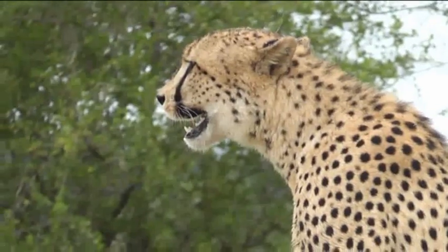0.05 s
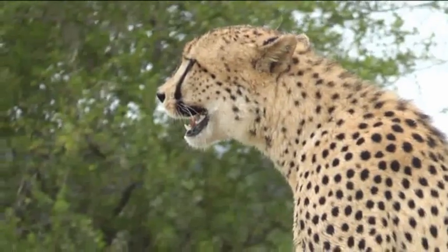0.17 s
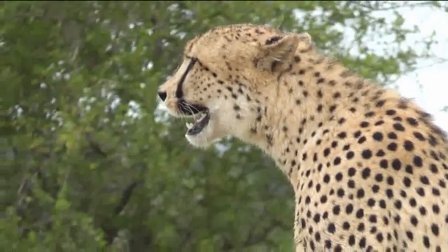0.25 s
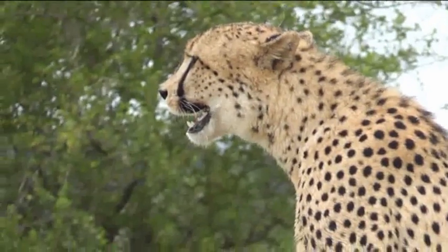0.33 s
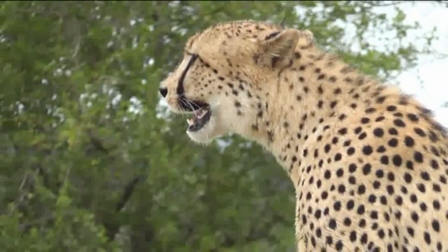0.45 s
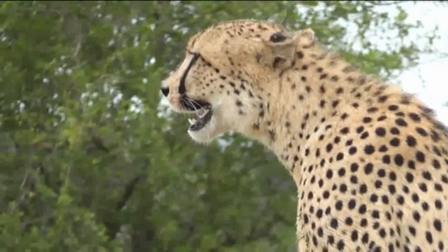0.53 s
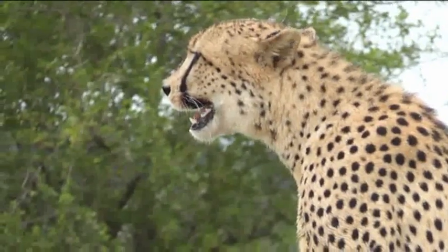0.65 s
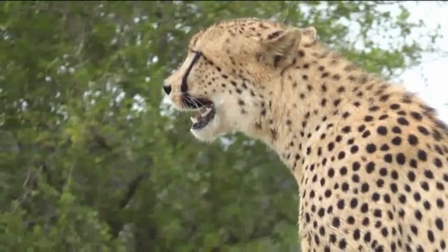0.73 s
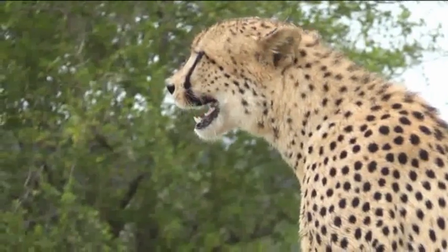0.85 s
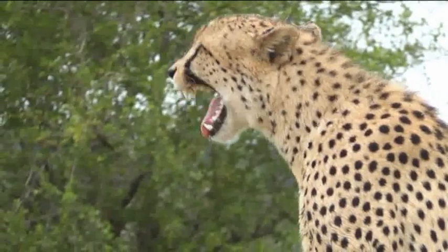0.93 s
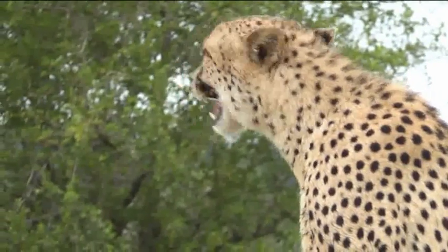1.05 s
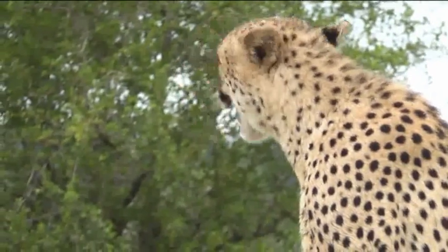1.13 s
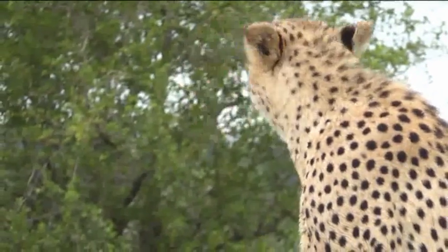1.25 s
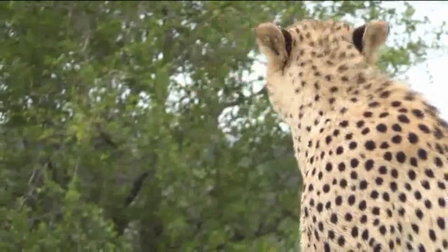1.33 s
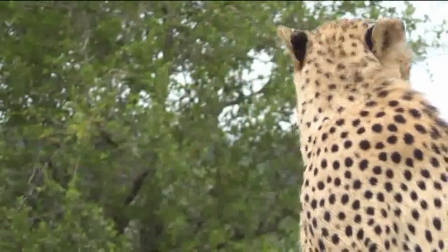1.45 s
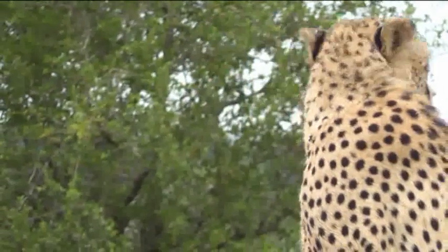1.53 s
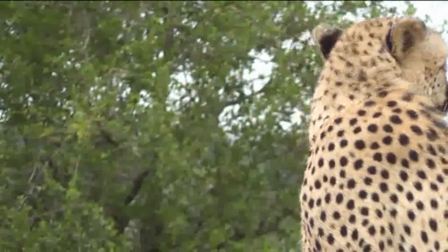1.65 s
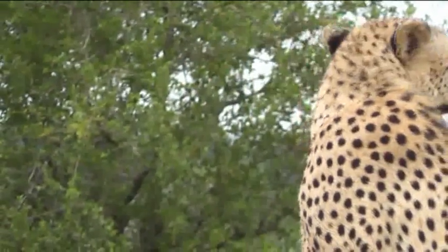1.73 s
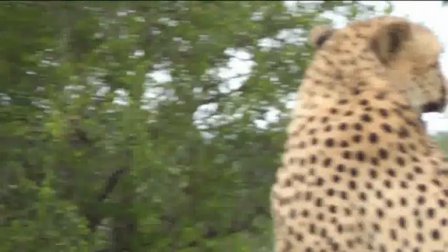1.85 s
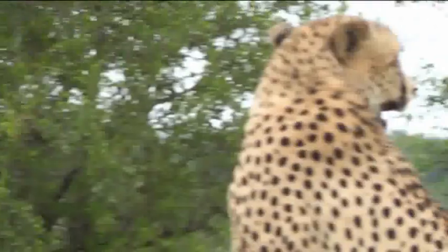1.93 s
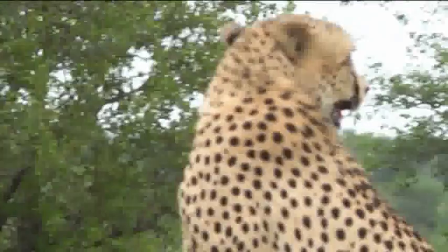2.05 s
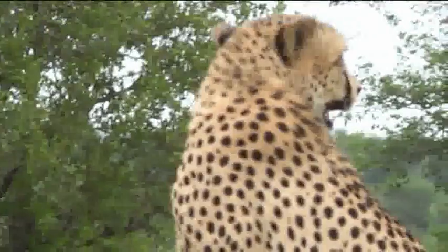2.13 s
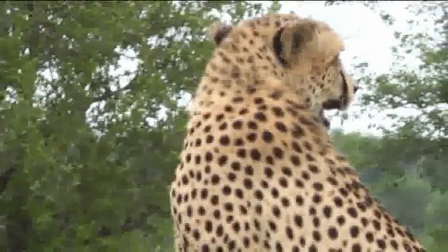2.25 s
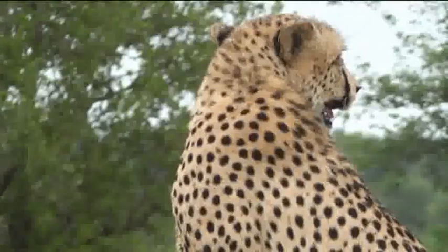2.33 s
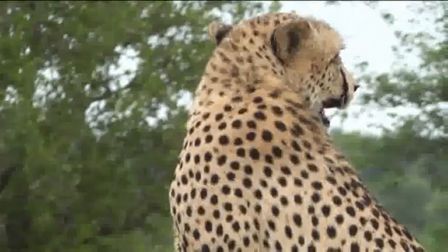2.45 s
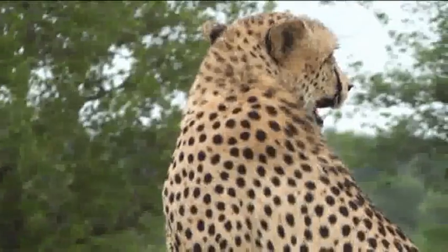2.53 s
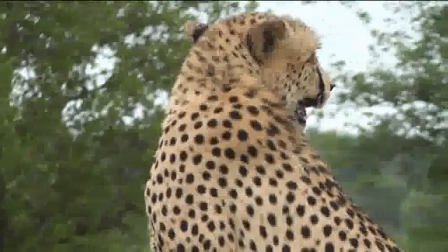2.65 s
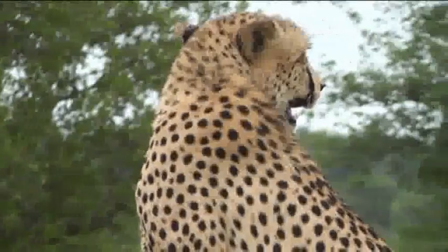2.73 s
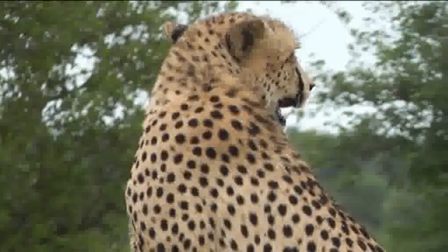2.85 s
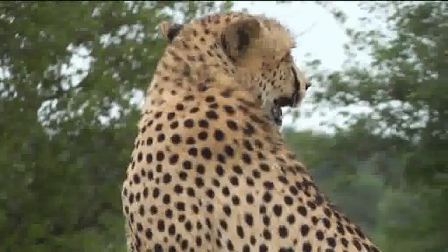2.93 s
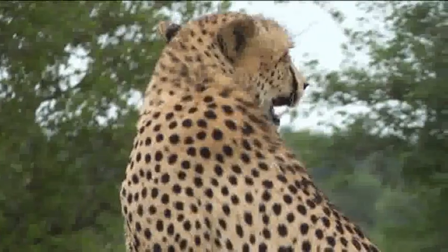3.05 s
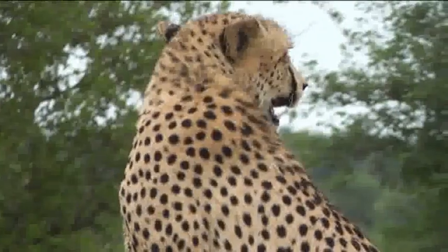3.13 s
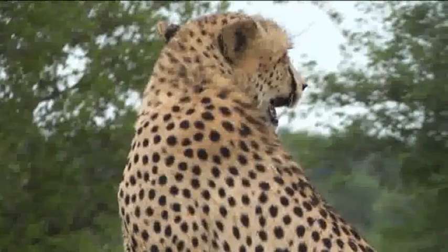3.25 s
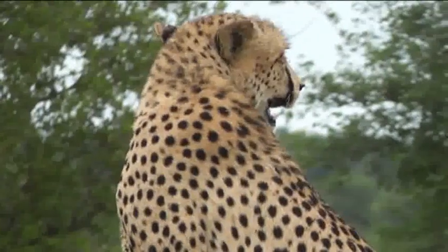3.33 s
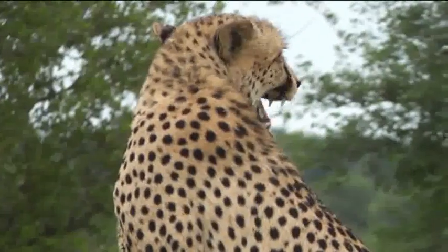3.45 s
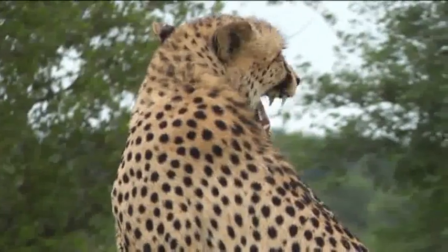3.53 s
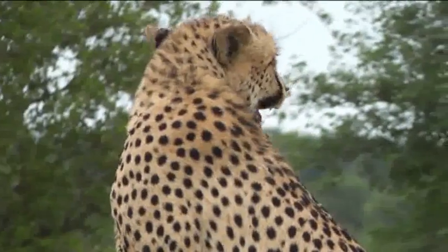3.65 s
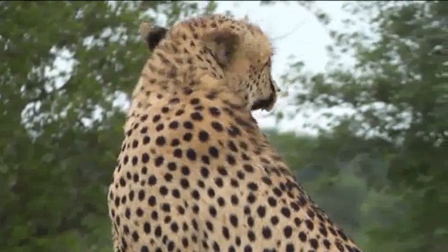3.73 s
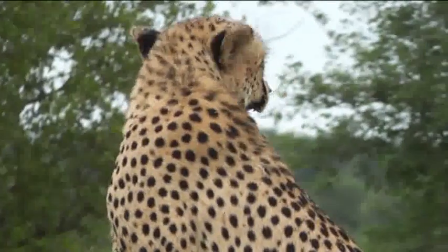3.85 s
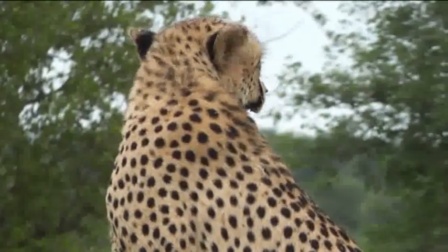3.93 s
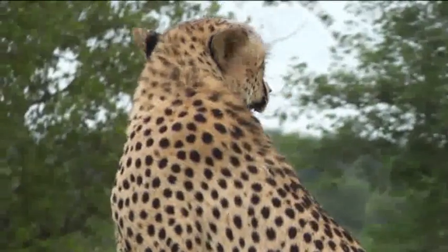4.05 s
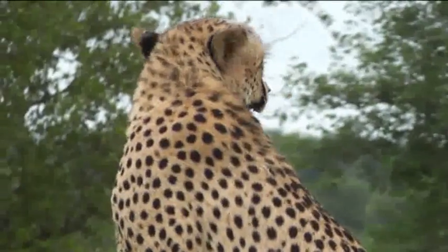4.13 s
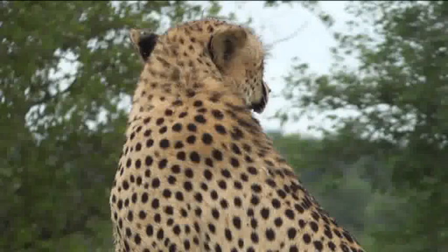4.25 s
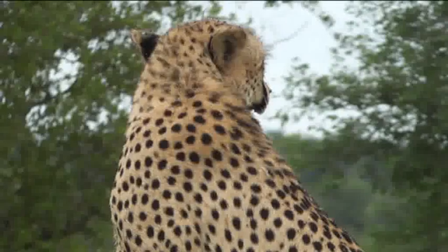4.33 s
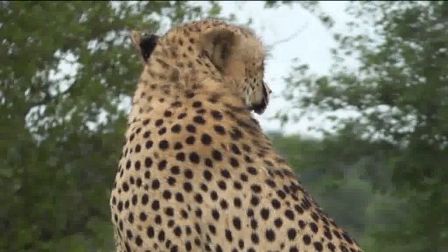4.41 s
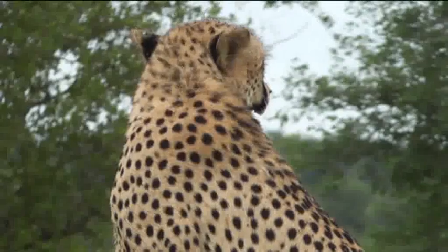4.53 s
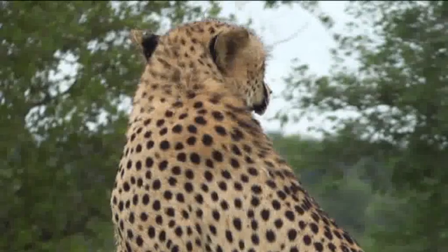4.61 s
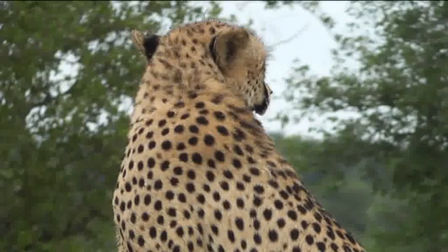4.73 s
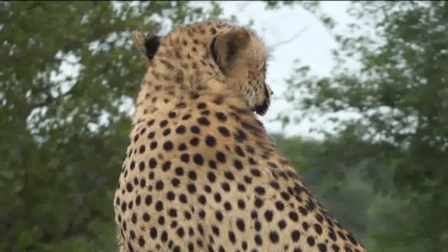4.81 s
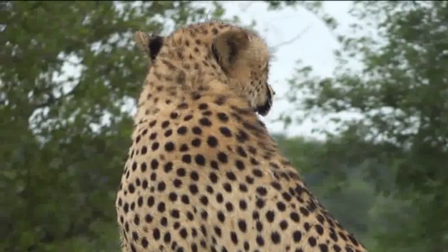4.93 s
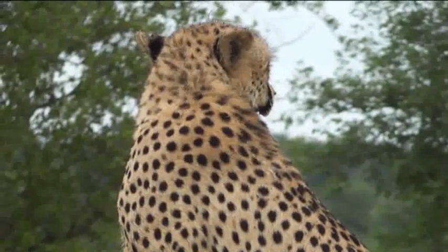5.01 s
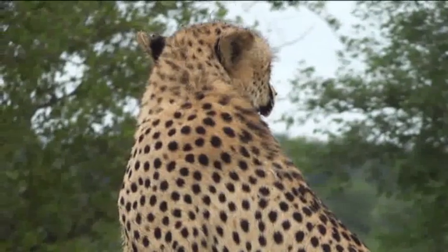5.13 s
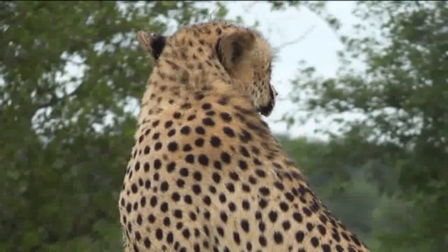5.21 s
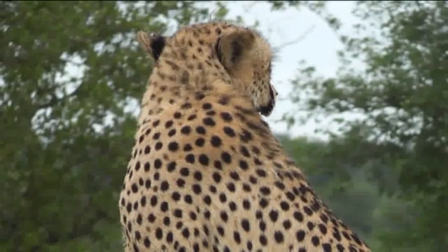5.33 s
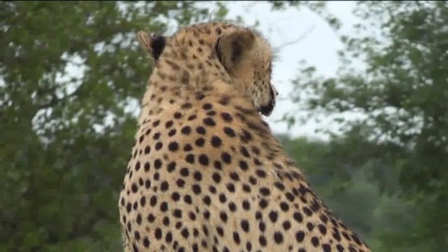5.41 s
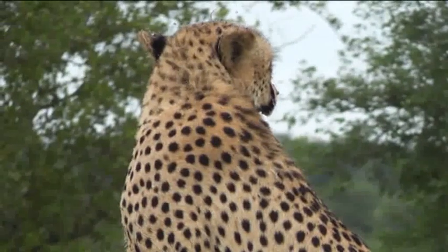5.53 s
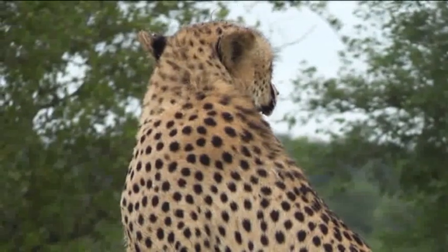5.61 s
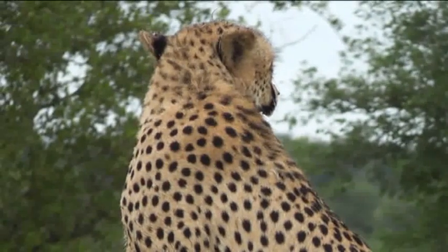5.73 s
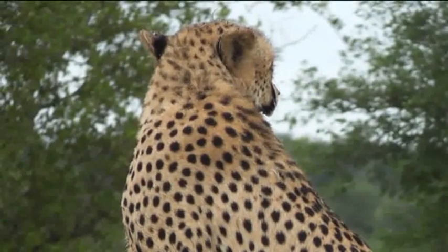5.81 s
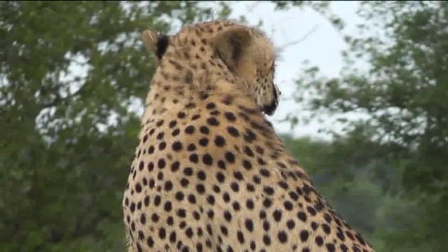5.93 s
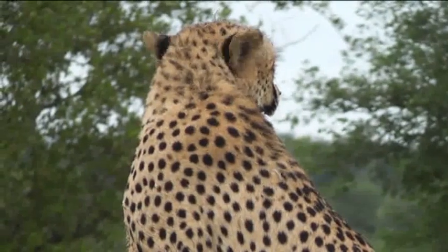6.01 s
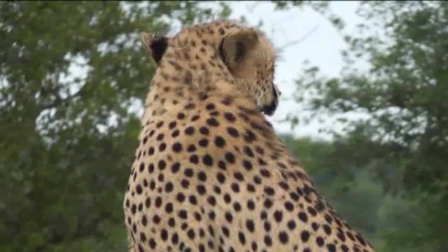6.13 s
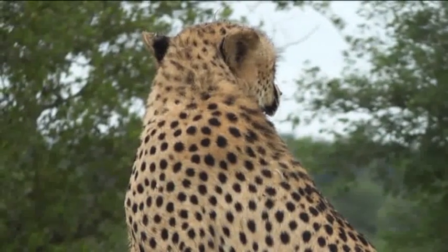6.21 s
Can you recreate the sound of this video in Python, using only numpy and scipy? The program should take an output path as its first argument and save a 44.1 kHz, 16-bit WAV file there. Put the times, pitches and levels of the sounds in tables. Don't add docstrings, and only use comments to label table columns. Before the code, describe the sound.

Quiet outdoor bushland with a soft, steady hiss of leaves, faint low rumble and a thin insect hum. At about 1.05 s a cheetah gives a very short, loud chirp, almost a pure whistle, jumping from around 1 kHz to above 2 kHz and dropping back within an eighth of a second, followed by quick tree echoes and a thin tail. Around it come tiny rustles, and a faint, rapid bird trill of steep down-sweeps runs to 1.3 s. Another trill comes at 2.8-3.1 s. At 3.6 s the cat chirps again, slightly lower and a little rougher, with echoes dying away. Afterwards the hiss is slightly stronger, with cricket and bee-like hums swelling faintly. Distant birds give short falling whistles, more often from 4.3 s, and a last trill comes at 5.4-5.7 s. Small ticks and rustles continue to the end at about 6.3 s.

```python
import sys
import numpy as np
from scipy import signal
from scipy.fft import rfft, irfft, next_fast_len
from scipy.io import wavfile
from scipy.ndimage import uniform_filter1d

SR = 44100
rng = np.random.default_rng(int(sys.argv[2]) if len(sys.argv) > 2 else 0)


def int16_out(signal):
    q = np.round(np.clip(np.atleast_2d(signal).T, -1, 1) * 32767)
    wavfile.write(sys.argv[1], SR, q.astype(np.int16))


def attenuation_scalar(level_db):
    decades = np.asarray(level_db, float) / 20
    return 10 ** decades


N = 276507


def walk(rate):
    hold = max(int(SR / rate), 2)
    held = rng.standard_normal(400)[np.arange(N) // hold % 400]
    return 0.872 * uniform_filter1d(uniform_filter1d(held, hold), hold)


def bins_hz():
    return np.fft.rfftfreq(next_fast_len(N), 1 / SR)


def shaped(gain):
    size = next_fast_len(N)
    return irfft(rfft(rng.standard_normal(size)) * gain, size)[:N]


def add(out, start_s, sound):
    i = max(int(start_s * SR), 0)
    out[i:i + len(sound)] += sound[:len(out) - i]


def decay(length, level_db, t60_s):
    return rng.standard_normal(length) * attenuation_scalar(level_db - 60 * np.arange(length) / SR / t60_s)


def glide(length_s, hz, db, swell):
    u = np.linspace(0, 1, int(length_s * SR))
    curve = np.polyfit(np.linspace(0, 1, len(hz)), hz, len(hz) - 1)
    phase = 2 * np.pi * np.cumsum(np.polyval(curve, u)) / SR
    return np.sqrt(2) * attenuation_scalar(db) * np.sin(np.pi * u) ** swell * np.sin(phase)


def at_pitch(table, hz):
    table_hz, db = np.transpose(table)
    return np.interp(np.log(hz), np.log(table_hz), db)


# (time [s], pitch [Hz], effort [dB])
CAT_CHIRPS = [
    [(1.059, 913, -44.5), (1.069, 1106, -50), (1.084, 1977, -40.5), (1.093, 2198, -28.5),
     (1.105, 2263, -24.5), (1.128, 2075, -22.5), (1.147, 1698, -28.5), (1.164, 1385, -31.5),
     (1.181, 1060, -42.5)],
    [(3.612, 959, -67), (3.629, 1036, -48), (3.645, 1770, -37.5), (3.658, 1890, -30.5), (3.676, 2036, -26),
     (3.692, 1830, -21), (3.708, 1460, -29), (3.724, 1230, -24), (3.74, 1100, -40.5)],
]
# (delay [s], level [dB])
TRUNK_ECHOES = [
    [(.022, 1.5), (.047, -4)],
    [(.025, -2), (.042, -17), (.058, -8.5), (.08, -34)],
]
# (sideways octave [dB], foliage tail [dB])
SIDEWAYS = [
    (-9.5, -34.5),
    (-17, -26),
]


def cat():
    out = np.zeros(N)
    octave_call_db = [0.5, -3.5]
    for rows, echoes, (dull_db, foliage_db), call_db in zip(CAT_CHIRPS, TRUNK_ECHOES, SIDEWAYS, octave_call_db):
        start_s = rows[0][0]
        front, side = voice(rows, call_db, dull_db)
        add(out, start_s, front)
        add(out, start_s, foliage(front, foliage_db))
        for delay_s, echo_db in echoes:
            add(out, start_s + delay_s, attenuation_scalar(echo_db) * bark_echo(side))
    return out


# (pitch [Hz], level against effort [dB])
THROAT_GAIN = [(1000, 1.5), (1350, -1.5), (1560, -9.5), (1740, -18), (1900, -1.5), (2050, 4), (2300, 0)]
# (pitch [Hz], level against effort [dB])
OCTAVE_GAIN = [(1000, -1), (1250, -18.5), (1500, -18), (1730, -21), (2050, -38), (2260, -30.5)]
# (pitch [Hz], level against effort [dB])
FLANK_GAIN = [(1000, -26), (1400, -17), (1700, -20), (1900, -14.5), (2260, -20)]


def voice(rows, call_db, dull_db):
    s, pitch_hz, effort = np.transpose(rows)
    t = np.arange(s[0], s[-1], 1 / SR)
    n = len(t)
    hz = uniform_filter1d(np.interp(t, s, pitch_hz), size=260, mode="nearest")
    effort_db = uniform_filter1d(np.interp(t, s, effort), size=260, mode="nearest")
    shut = np.clip(1 - 2 * (t - s[0]) / (s[-1] - s[0]), 0, 1)
    front_db = effort_db + at_pitch(THROAT_GAIN, hz) + 0.45 * walk(154)[:n]
    octave_db = effort_db + at_pitch(OCTAVE_GAIN, hz) + call_db + 3 * np.sin(np.pi * shut)
    side_db = effort_db + at_pitch(FLANK_GAIN, hz) - 9 * shut
    side_octave_db = np.minimum(octave_db - 5.0, side_db + dull_db)
    phase = 2 * np.pi * np.cumsum(hz) / SR
    edge = np.sqrt(2) * signal.windows.tukey(n, .04)
    overtones = np.sin(2 * phase) + attenuation_scalar(-18.0) * np.sin(3 * phase)
    overtones = overtones * attenuation_scalar(4.3 * walk(174.6)[:n] + 0.5)
    front = edge * (attenuation_scalar(front_db) * np.sin(phase) + attenuation_scalar(octave_db) * overtones)
    side_db = side_db + 2.9 * walk(122)[:n]
    side = edge * (attenuation_scalar(side_db) * np.sin(phase) + attenuation_scalar(side_octave_db) * overtones)
    return front, side


def foliage(front, tail_db):
    lag = np.arange(SR // 2) / SR
    near = attenuation_scalar(tail_db - 60 * lag / 0.85) * np.clip(lag / .02, 0, 1)
    far = attenuation_scalar(-47.5) * np.exp(-((lag - 0.34) / 0.081) ** 2)
    leaves = rng.standard_normal(len(lag)) * (near + far) * np.sqrt(40 / SR)
    return signal.fftconvolve(front, leaves)


def bark_echo(side):
    bark = rng.standard_normal(900) * attenuation_scalar(-22.5) * np.exp(-np.arange(900) / SR / 0.0088)
    bark[0] = 1.0
    return np.convolve(side, bark)


# (centre of last note [s], loudest level [dB])
WARBLER_TRILLS = [
    (1.277, -45.5),
    (3.1003, -45),
    (5.719, -44),
]
TRILL_NOTES = [(7, 10), (7, 9), (7, 10)]


def warbler():
    out = np.zeros(N)
    gap_s, soft_gap_s, note_s = .01755, .0168, .0135
    note_hz, soft_hz = np.array([5696, 4950, 3900]), np.array([4770, 4070])
    for (last_s, db), (soft, loud) in zip(WARBLER_TRILLS, TRILL_NOTES):
        first_s = last_s - (loud - 1) * gap_s
        for k in range(loud):
            detune, louder, late = rng.standard_normal(3)
            lower_hz = np.exp(-k) * np.array([380, 60, 0])
            hz = (note_hz - lower_hz) * (1 + 0.0061 * detune)
            note_db = db + 4.0 - 4 * np.exp(-k / 0.57) + 0.89 * louder
            note = glide(note_s, hz, note_db, swell=0)
            shape_db = np.interp(np.linspace(0, 1, len(note)), [0, 0.25, 0.86, 1], [-12, -6, -10.5, -27.5])
            add(out, first_s + k * gap_s - 0.36 * note_s + .0003 * late, note * attenuation_scalar(shape_db))
        for k in range(soft):
            note_db = np.interp(k, [0, soft - 1], [-11.5, -15])
            note_db += 3 * np.exp(-k / .7) + 1.2 * rng.standard_normal()
            hz = soft_hz + np.array([600 * np.exp(-k / 0.99), 0])
            note = glide(0.01, hz, db - 0.5 + note_db, swell=0.79)
            add(out, first_s - (k + 1) * soft_gap_s - .005, note)
    twigs = decay(SR // 20, -37.5, t60_s=0.063)
    return out + signal.fftconvolve(out, twigs)[:N]


# (time [s], length [s], start pitch [Hz], end pitch [Hz], level [dB])
FAR_WHISTLES = [(0, 0.036, 3000, 2620, -66), (0.382, 0.054, 3280, 2770, -63),
                (0.394, 0.02, 5440, 4950, -62), (0.938, 0.044, 3650, 3020, -62),
                (1.011, 0.03, 3750, 4200, -65), (1.048, 0.03, 4180, 3860, -58),
                (1.073, 0.017, 3600, 3860, -53.5), (1.327, 0.044, 3670, 2980, -62),
                (1.391, 0.036, 2200, 1900, -61), (1.667, 0.072, 3860, 2770, -56),
                (3.85, 0.13, 3900, 2660, -66), (4.325, .055, 3690, 3025, -58),
                (4.787, 0.074, 3800, 2780, -55.5), (5.126, 0.068, 3710, 2780, -56),
                (5.177, 0.074, 3600, 2600, -62), (5.251, 0.063, 5300, 4240, -60.5),
                (5.417, 0.1, 3460, 2520, -56.5), (5.55, .028, 4770, 4230, -61),
                (5.669, 0.057, 3320, 2650, -56), (5.755, .035, 2830, 2440, -60),
                (5.757, 0.062, 5080, 4020, -59), (6.131, 0.015, 3340, 2420, -56)]


def whistlers():
    out = np.zeros(N)
    for s, length_s, *hz, db in FAR_WHISTLES:
        add(out, s, glide(length_s, hz, db, swell=0.61))
    out = out * attenuation_scalar(2.8 * walk(150) - 1.0)
    tail = decay(SR // 8, -38.5, t60_s=0.23)
    return out + signal.fftconvolve(out, tail)[:N]


# (pitch [Hz], level at rest [dB], width [Hz], throbs [per s], pitch rise in a swell [Hz])
HUM_TONES = [
    (560.7, -70, 24, 30, 14),
    (495, -80.5, 9, 6.6, 4.5),
    (280, -85, 6.1, 14, -2),
    (2465, -79, 57, 12, 3.5),
    (2340, -88.5, 88, 19, 3.5),
]
# (centre [s], length [s], level [dB])
HUM_SWELLS = [
    [(0.35, 1.106, -68), (3.3, 0.62, -61.5), (5.08, .3, -64), (6.25, 0.45, -64)],
    [(2, .7, -72), (4.4, .7, -62.5), (5.7, 0.43, -67.5)],
    [(2.8, 0.42, -68), (3.65, 0.79, -71.5), (4.75, 0.45, -69)],
    [(2.9, 2.2, -65.5), (4.45, 1.16, -59.5)],
    [(5.6, 1.23, -62)],
]


def hums():
    out, t, f = 0, np.arange(N) / SR, bins_hz()
    for (hz, rest_db, width_hz, rate, rise_hz), swells in zip(HUM_TONES, HUM_SWELLS):
        near = [np.exp(-(2 * (t - s) / length_s) ** 2) for s, length_s, _ in swells]
        swell_db = np.transpose(swells)[2]
        gain = attenuation_scalar(rest_db) + np.dot(attenuation_scalar(swell_db), near)
        line = 1 / (1 + (2 * f / width_hz) ** 2)
        blur_sin, blur_cos = shaped(line), shaped(line)
        phase = 2 * np.pi * np.cumsum(hz + rise_hz * sum(near) + 3 * walk(2.5)) / SR
        tone = (blur_sin * np.sin(phase) + blur_cos * np.cos(phase)) / blur_sin.std()
        out = out + tone * gain * attenuation_scalar(1.2 * walk(rate) - 5.5)
    return out


# (time [s], length [s], centre
# [Hz], width [Hz], level [dB])
RUSTLE_BURSTS = [(0.876, 0.028, 1600, 900, -57), (0.932, .025, 2610, 1100, -60),
                 (1.059, 0.015, 1150, 600, -49.5), (1.064, .009, 2150, 500, -56),
                 (1.801, 0.054, 280, 160, -65.5), (1.982, 0.016, 2950, 300, -56.5),
                 (2.147, 0.022, 2650, 300, -65), (2.232, 0.022, 2620, 400, -59),
                 (2.371, 0.077, 154, 40, -72.5), (5.475, .015, 6000, 686, -64),
                 (5.805, 0.02, 6100, 503, -62.5), (5.909, 0.0096, 2770, 1514, -54),
                 (6.018, 0.0098, 2800, 492, -61), (6.135, 0.074, 2350, 198, -59)]


def rustles():
    out, f = np.zeros(N), np.fft.rfftfreq(4096, 1 / SR)
    for s, length_s, hz, width_hz, db in RUSTLE_BURSTS:
        resonance = 1 / (1 + (2 * (f - hz) / width_hz) ** 4)
        burst = irfft(rfft(rng.standard_normal(4096)) * resonance)
        n = min(int(length_s * SR), 4096)
        add(out, s, attenuation_scalar(db) * burst[:n] / burst.std() * np.hanning(n) ** .5)
    return out


# (time [s], level [dB])
LEAF_WIND = [(0.0, -62.5), (0.77, -62.5), (1.3, -59.5), (3.39, -59.5), (3.8, -57.5), (5.3, -58.5),
             (6.27, -59.5)]
# (frequency [Hz], level [dB per Hz])
LEAF_COLOUR = [(12, -46), (20, -3), (40, -6.5), (65, -19.5), (155, -14), (187, -19.5), (219, -8), (433, -6),
               (494, -4), (610, -7.5), (836, -4.5), (2040, -7.5), (2460, -5.5), (8900, -16.5), (10700, -24),
               (13900, -47), (22000, -120)]
# (centre [Hz], width [Hz], level against the hiss [dB], swell [dB], swells [per s])
INSECT_BANDS = [(30, 10, -31, 3, 3.6), (557, 52, -11.5, -0.5, 4.1), (759, 58, -13.5, 5, 4),
                (849, 82, -8, 3, 5), (1081, 120, -6.5, -2, 2.8), (1243, 78, -8.5, 1, 5.8),
                (1898, 75, -16.5, 0.5, 4.3), (1600, 110, -15, -4, 3.03), (3650, 1450, -5, 2, 11),
                (8630, 3400, -11, 1.7, 46), (4500, 990, -21, 5, 17)]


def bush():
    t, f = np.arange(N) / SR, bins_hz() + 1
    colour = attenuation_scalar(at_pitch(LEAF_COLOUR, f))
    mid = (f > 400) & (f < 1500)
    colour = colour / np.sqrt(np.sum(colour[mid] ** 2) / len(f))
    level_db = np.interp(t, *np.transpose(LEAF_WIND))
    tilt_db = 0.44 * (level_db - level_db.mean())
    rumble_db = -57.5 - level_db
    out, gust = 0, walk(7.1)
    for octave in np.arange(4, 14):
        share = np.cos(np.pi / 2 * np.clip(np.log2(f) - octave, -1, 1))
        steady = np.clip((8 - octave) / 2, 0, 1)
        treble = np.clip((octave - 10) / 3, 0, 1)
        flicker_db = (.4 - 0.023 * octave) * gust + 1.6 * walk(30)
        db = treble * tilt_db + steady * rumble_db + flicker_db
        out = out + attenuation_scalar(db - 4.5) * shaped(colour * share)
    for hz, width_hz, db, swell_db, rate in INSECT_BANDS:
        band = shaped(1 / (1 + (2 * (f - hz) / width_hz) ** 2))
        out = out + band / band.std() * attenuation_scalar(db + swell_db * walk(rate))
    return out * attenuation_scalar(level_db)


def scene():
    return (cat() + warbler() + whistlers() + hums() + rustles() + bush())[None]


def band_limit(x):
    return signal.sosfilt(signal.butter(12, 12000, fs=SR, output="sos"), x)


# (centre [s], length [s])
TREBLE_GAPS = [(.05, .04), (0.625, .015), (.91, .025), (1.12, 0.032), (1.187, 0.032), (2.4, 0.046),
               (2.68, .012), (3.75, 0.016), (3.922, .012), (4.43, 0.016), (5.006, 0.023), (5.25, 0.012),
               (5.6, .014), (5.8, .014), (6.166, 0.017)]


def record(dry):
    f, t = np.fft.rfftfreq(N, 1 / SR), np.arange(N) / SR
    fold_hz = SR / 4
    kept = rfft(dry) / (1 + np.exp(np.clip((f - 10690) / 22, -50, 50)))
    gap = sum(np.exp(-(2 * (t - s) / length_s) ** 4) for s, length_s in TREBLE_GAPS)
    top_band = irfft(kept * (f > 10150), N)
    kept = irfft(kept, N) - np.clip(gap, 0, 1) * top_band
    mirror = rfft(kept * (-1.) ** np.arange(N))
    leak_db = -8.5 - 20.5 * np.clip(f - fold_hz - 400, 0, None) / 1000
    leak = attenuation_scalar(leak_db) * (f > fold_hz)
    return band_limit(kept + irfft(leak * mirror, N))


dry = scene()
out = record(dry)
int16_out(out)
```